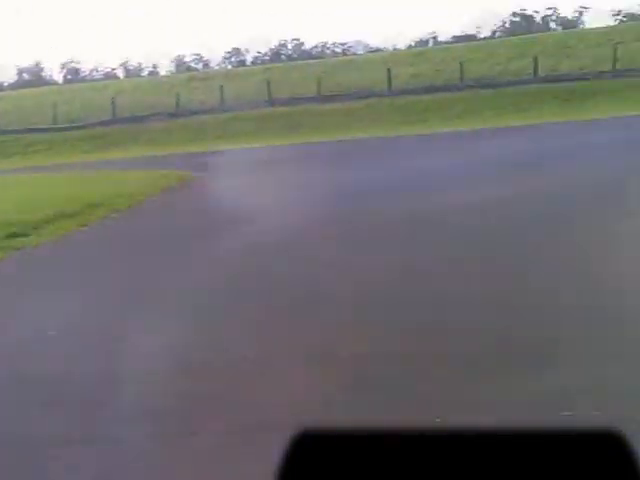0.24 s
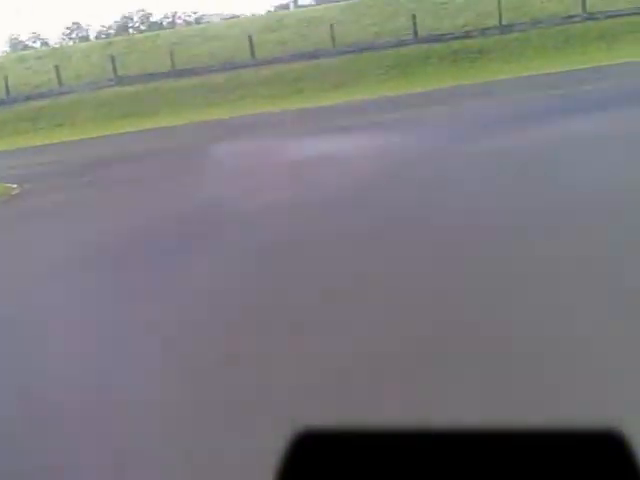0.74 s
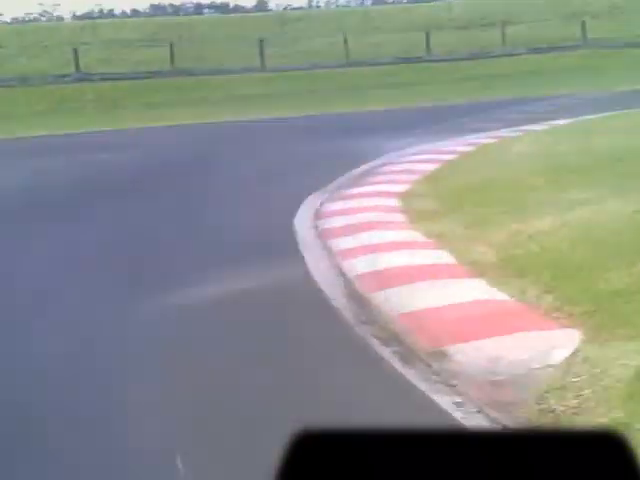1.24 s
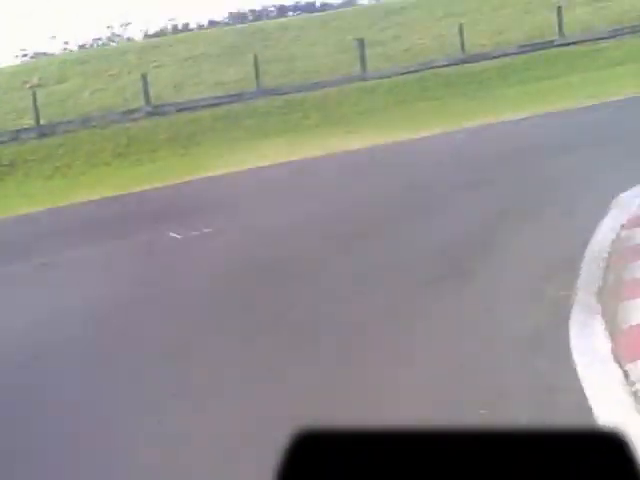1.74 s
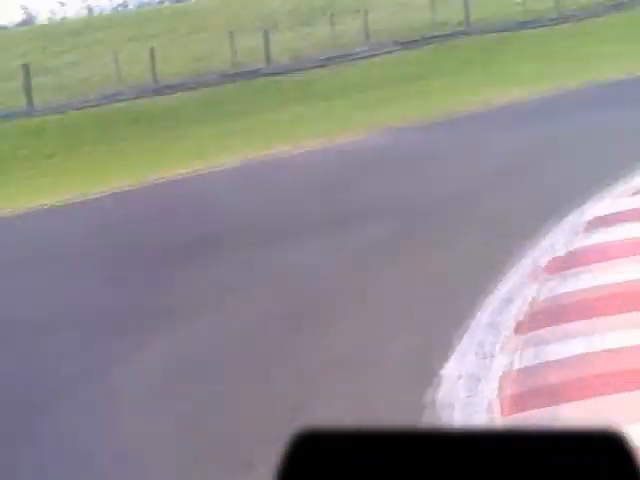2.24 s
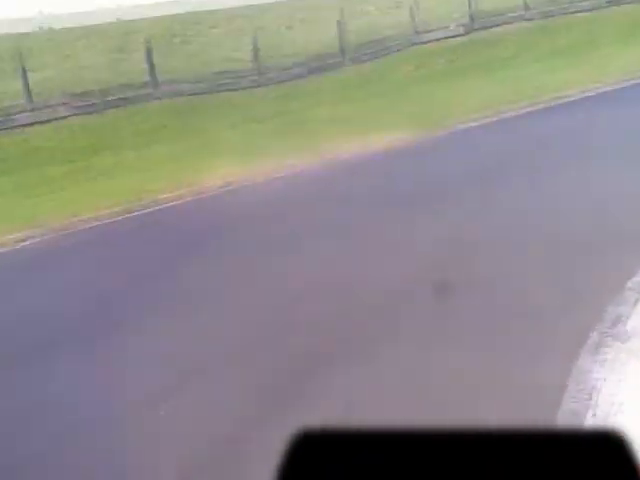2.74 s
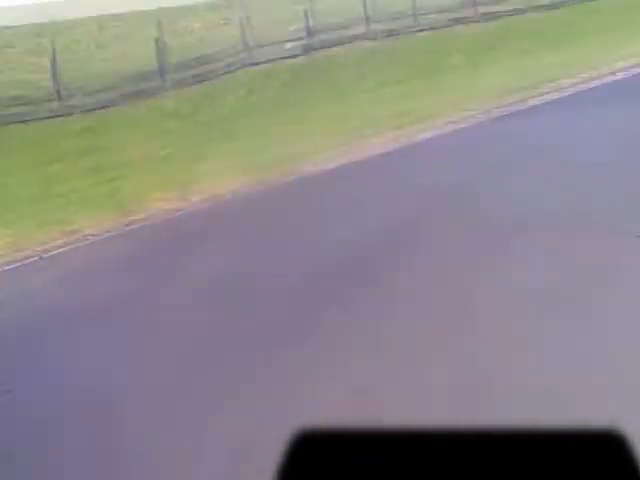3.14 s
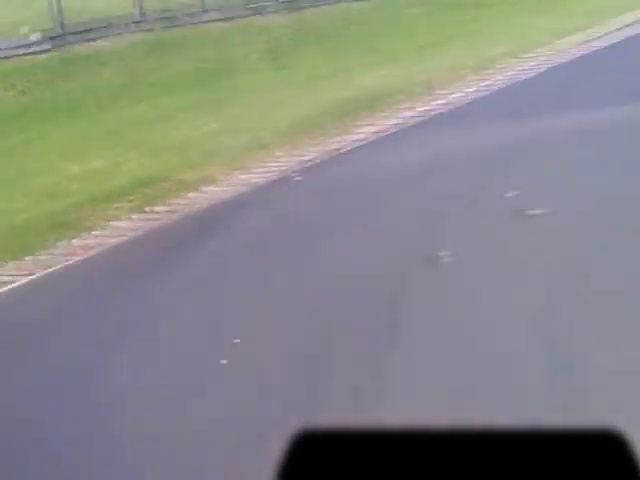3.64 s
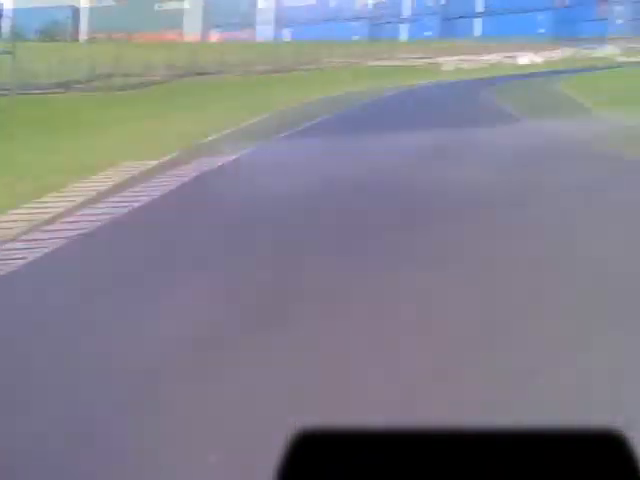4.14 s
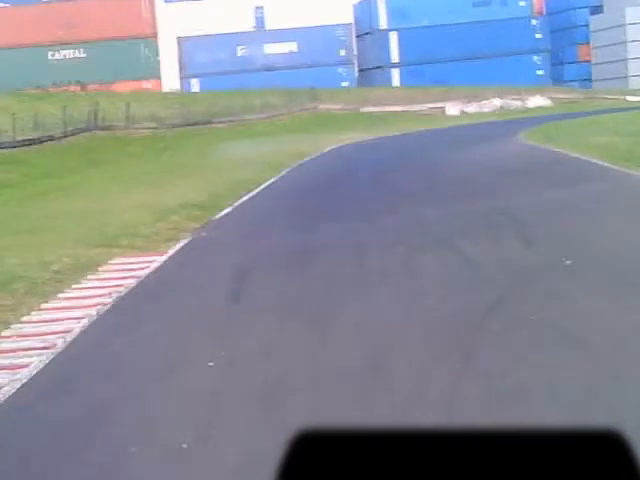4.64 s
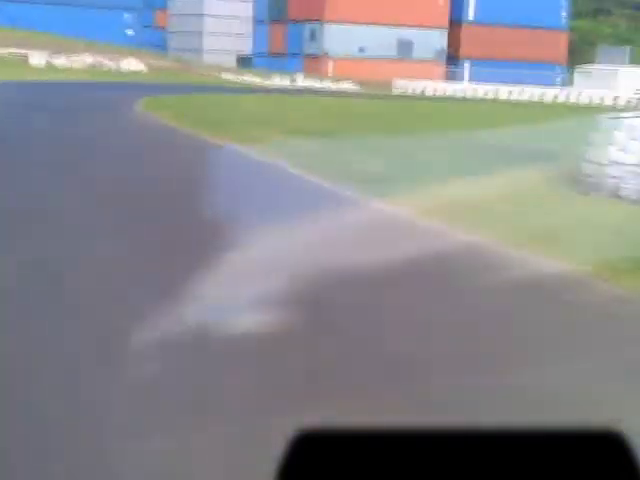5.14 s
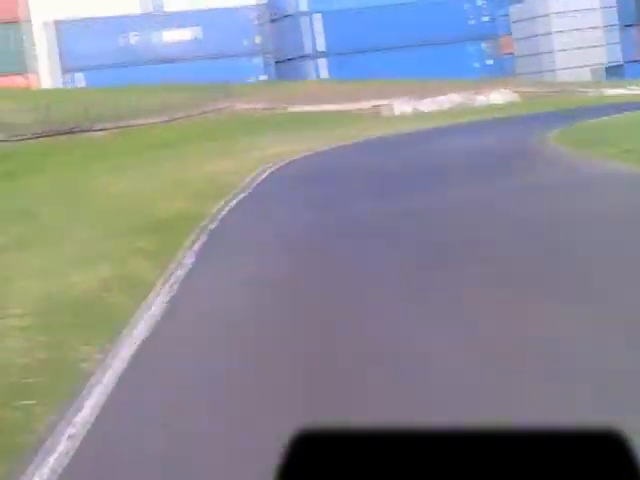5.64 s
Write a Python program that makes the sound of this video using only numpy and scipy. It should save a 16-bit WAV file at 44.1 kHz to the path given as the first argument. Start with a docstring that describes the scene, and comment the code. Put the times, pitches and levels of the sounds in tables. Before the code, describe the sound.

Close on-board microphone on an open-air kart track. First a soft engine putter, wind and a higher rival engine; then a metallic clatter enters abruptly and tyre roar swells around the apex. From about three seconds the engine pulls hard, a rapid booming throb with ringing valve knocks, rattling chain and frame, rising gradually while wind gusts thump the microphone.

```python
"""Kart through a corner and up the straight

On board a four-stroke kart, microphone at the seat: it rolls through a corner, then pulls away. Each firing is
a sum of orders through the pipe, and the airbox boom moves down the orders as the speed climbs; valve knocks
ring the casing and gears whine at orders of the firing rate. Shaped noise makes the frame rattle, the tyre roar
and scrub, and the wind at the microphone. Another engine passes close by in the corner, and a faint whistle
glides on the way in."""
import sys
import numpy as np
from scipy import signal
from scipy.fft import rfft, irfft, next_fast_len
from scipy.io import wavfile

SR = 44100
rng = np.random.default_rng(int(sys.argv[2]) if len(sys.argv) > 2 else 0)


def transcribe(u):
    """Save the signal u as a 16-bit wav file named by the first command-line argument.

    u: samples, shape (n,) or (channels, n), limited to [-1, 1]; the rate is SR.
    q: integer samples, one column per channel.
    """
    v = np.clip(np.atleast_2d(u).T, -1, 1)
    q = np.round(v * 32767).astype(np.int16)
    wavfile.write(sys.argv[1], SR, q)


N = 260190
T = np.arange(N) / SR


def amp(db):
    """Decibels to gain."""
    return 10 ** (np.asarray(db) / 20)


def unit(x):
    """Scales to rms 1."""
    return x / np.sqrt(np.mean(x ** 2) + 1e-20)


def curves(rows, t=T):
    """The columns of a table, joined by straight lines in time."""
    s, *columns = np.transpose(rows)
    return [np.interp(t, s, c) for c in columns]


def hump(x, centre, width):
    """A bell of height 1, half as high at half the width from its centre."""
    return 1 / (1 + (2 * (x - centre) / width) ** 2)


def drift(hz):
    """Slow chance of rms 1, up to about hz."""
    t = np.linspace(0, T[-1], num=4096)
    f = np.fft.rfftfreq(len(t), t[1])
    spectrum = rfft(rng.standard_normal(len(t))) * np.exp(-(f / hz) ** 2)
    return np.interp(T, t, unit(irfft(spectrum)))


def colour(x, spectrum):
    """Filters by a table of f/Hz, level/dB, joined along log frequency; rms 1."""
    hz, db = np.transpose(spectrum)
    size = next_fast_len(N, True)
    f = np.fft.rfftfreq(size, 1 / SR)
    gain = amp(np.interp(np.log(f + 1), np.log(hz + 1), db))
    return unit(irfft(rfft(x, size) * gain, size)[:N])


def ring(x, hz, width):
    """A resonance of gain 1 at its peak."""
    return signal.lfilter(*signal.iirpeak(hz, hz / width, SR), x)


# Engine speed before surging, a lift, a blip for the corner, then the long pull:
# t/s, f/Hz [firings per second]
ENGINE_SPEED = [(0, 45.45), (.3, 45.6), (.55, 41.5), (.8, 42.4), (1.02, 46.4), (1.1, 42.15), (1.8, 43.38),
                (2.7, 44.13), (3.2, 44.71), (3.65, 46.88), (4.1, 48.84), (4.4, 50.65), (5.1, 53.9),
                (5.9, 58.8)]
# Bouts of surging: start t/s, strongest t/s, end t/s, one crest t/s, swing f/Hz [firings per second]
SURGE_BOUTS = [(0.999, 1.502, 4.0, 1.865, .6), (4.1, 5.403, 9, 5.355, 1.15)]
FIRINGS_PER_WHEEL_TURN = 8.52


def crank(jitter=.0012):
    """Firings per second: the speed surges with each turn of the wheels about its slow climb."""
    climb, = curves(ENGINE_SPEED)
    turns = np.cumsum(climb) / SR / FIRINGS_PER_WHEEL_TURN
    surge = 0
    for start, top, end, crest, swing in SURGE_BOUTS:
        depth = np.interp(T, [start, top, end], [0, swing, 0])
        turns_from_crest = turns - np.interp(crest, T, turns)
        surge = surge + depth * np.cos(2 * np.pi * turns_from_crest)
    return (climb + surge) * (1 + jitter * drift(40))


def octaves(corner_rate_hz=43.75):
    """How far the slow climb of engine speed lies above its cornering speed."""
    return np.log2(curves(ENGINE_SPEED)[0] / corner_rate_hz)


# Engine load: t/s, load [0 rolling, 1 pulling, 2 flat out]
ENGINE_LOAD = [(0, 0), (2.75, 0), (3.35, 0.75), (4.1, 0.99), (5.0, 1.84), (5.9, 2)]
# Exhaust effort, the summed strength of orders 6 and up before the boom: t/s, level/dB
EXHAUST_EFFORT = [(0, -39.5), (.8, -41.5), (1.05, -34.5), (1.55, -32), (2.0, -33.5), (2.7, -33.5),
                  (3.1, -27), (3.15, -24.5), (3.5, -19.5), (3.7, -16.5), (4.35, -16.5), (4.95, -19),
                  (5.3, -16.5), (5.6, -17), (5.9, -22)]
# Shape of the exhaust pulse at each load: order [multiples of the firing rate], relative level/dB
PULSE_ROLLING = [(1, -1), (2, 0), (3, -7.5), (4, -5), (5, -13), (6, -6.5), (7, -9), (8, -14), (9, -14.5),
                 (10, -12.5), (11, -24), (12, -12), (13, -11.5), (14, -20), (15, -23.5), (16, -19.5)]
PULSE_PULLING = [(1, -18.5), (2, -7.5), (3, -7.5), (4, -9), (5, -7), (6, 2), (7, -4), (8, -8), (9, -21.5),
                 (10, -15.5), (11, -15.5), (12, -18), (13, -18.5), (14, -36.5), (15, -25), (16, -26)]
PULSE_FLAT_OUT = [(1, -16.5), (2, -13.5), (3, -9.5), (4, -11), (5, -10), (6, -8.5), (7, -13), (8, -16.5),
                  (9, -8), (10, -13), (11, -32), (12, -24), (13, -20), (14, -23.5), (15, -37), (16, -28)]
BOOM_HZ, BOOM_WIDTH_HZ, BOOM_LIFT_DB = 217.25, 31.5, 14.5


def exhaust(cycles, low_db=-2, low_fade_db=1.6, wander_db=1.5):
    """One swell of pipe ringing a firing; load sets its shape, and combustion steadies under pull."""
    t = np.linspace(0, T[-1], num=600)
    load, = curves(ENGINE_LOAD, t)
    pull = np.minimum(load, 1)
    shapes = np.array([PULSE_ROLLING, PULSE_PULLING, PULSE_FLAT_OUT])[:, :, 1]
    db = np.array([np.interp(load, [0, 1, 2], order) for order in shapes.T])
    index = np.arange(len(db))[:, None]  # order minus 1

    effort, = curves(EXHAUST_EFFORT, t)
    db += effort - 20 * np.log10(np.linalg.norm(amp(db[5:]), axis=0))
    db[:3] += low_db - low_fade_db * load
    # whichever order passes the resonance of the airbox booms
    order_hz = (index + 1) * curves(ENGINE_SPEED, t)[0]
    db += BOOM_LIFT_DB * hump(order_hz, BOOM_HZ, BOOM_WIDTH_HZ)
    # off the throttle the orders wander
    wander = np.array([np.interp(t, T, drift(4)) for _ in db])
    db += wander_db * (1 - pull) * wander

    # a firing builds up gradually under pull, and starts more abruptly flat out
    abrupt = np.interp(load, [1, 2], [.2, .5])  # share of minimum phase
    mirrored = amp(np.vstack([db[:1], db, db[-2::-1]]))
    minimum_phase = -signal.hilbert(np.log(mirrored), axis=0).imag[1:len(db) + 1]
    phase = abrupt * minimum_phase
    # the deep gulp of the intake comes part of a cycle before the higher bark of the pipe
    lead = np.interp(load, [0, 1, 2], [0.452, 0.25, 0.17])  # cycles
    phase += 2 * np.pi * lead * np.minimum(index - 5, 0)
    # the silencer smears the highest orders in time, which softens the gentler strokes
    smear = np.interp(load, [0, 1, 2], [0.1275, .12, 0.092])  # radians per order squared
    phase -= smear * np.maximum(index - 6, 0) ** 2

    pulses, turn, wave = 0, np.exp(2j * np.pi * cycles), 1
    for level, angle in zip(db, phase):
        wave = wave * turn  # next order
        strength = np.interp(T, t, amp(level) * np.exp(1j * angle))
        pulses = pulses + (wave * strength).real
    rough = np.interp(np.interp(T, t, load), [0, 1], [0.12, 0.02])
    return -np.sqrt(2) * pulses * (1 + rough * drift(30))


# Valve knocks within one engine cycle, ahead of a shared lag: place [0-1 of a cycle], strength
VALVE_KNOCKS = [(0, 1), (.444, .8)]


def knocks(cycles, length, lag=.12):
    """Dying bursts at the valve events; length and lag are in cycles."""
    return sum(size * np.exp(-((cycles - place - lag) % 1) / length) for place, size in VALVE_KNOCKS)


# Casing resonances: f/Hz, width f/Hz, relative level/dB
CASING_MODES = [(960, 66, -9), (1105.6, 150, -4.5), (1224, 110, 12.5), (1321, 43, 2.5), (1600, 310, -11.5),
                (1822, 58, -13.5), (2250, 840, -31)]
# Valve clack, how hard the engine shakes its casing; gears and rattle follow it: t/s, level/dB
CLACK_LEVEL = [(0, -64), (.88, -56), (.97, -35), (1.2, -39), (2.4, -37), (3.05, -29.5), (3.5, -28.5),
               (3.9, -28), (4.15, -33), (4.8, -29.5), (5.27, -26), (5.5, -29), (5.9, -25.5)]


def casing(x):
    """The casing rings at its resonances, each a narrow peak followed by a wider one; rms 1."""
    return unit(sum(amp(db) * ring(ring(x, hz, width), hz, 2 * width) for hz, width, db in CASING_MODES))


def valves(cycles, soft_hz=4500, uneven=0.037):
    """Valve knocks ring the casing; they are cleanest under a steady pull."""
    blows = unit(np.diff(knocks(cycles, 0.0028), prepend=0)) * (1 + uneven * drift(80))
    blows = signal.sosfilt(signal.butter(2, soft_hz, fs=SR, output="sos"), blows)
    chatter = knocks(cycles, 0.41) * rng.standard_normal(N)
    loose = np.interp(curves(ENGINE_LOAD)[0], [0, 1, 2], [0.28, 0.055, 0.49])
    mix = np.sqrt(1 - loose ** 2) * casing(blows) + loose * casing(chatter)
    return amp(curves(CLACK_LEVEL)[0]) * mix


# Gear whines, each swelling as it crosses a resonance:
# order [of the firing rate], level/dB [against the clack], resonance f/Hz, width f/Hz, lift/dB
GEAR_WHINES = [(22, -14, 1195, 52, 12), (44, -27, 2280, 80, 15.5), (43, -30.5, 1840, 92, 25.5),
               (42, -30.5, 2335, 80, 12.5)]
TEETH = 22


def gears(rate, cycles, slack=0.34, throb=0.33):
    """Tooth whines locked to the crank, throbbing with each turn and shaken by backlash."""
    angle = 2 * np.pi * cycles + slack * drift(45) / TEETH  # slack in radians of tooth phase
    whine = 0
    for order, db, hz, width, lift in GEAR_WHINES:
        order = round(order)
        level = db + lift * hump(order * rate, hz, width)
        whine = whine + amp(level) * np.sin(order * angle)
    throbbing = 1 + throb * np.cos(2 * np.pi * 2 * cycles)  # two crank turns a firing
    return np.sqrt(2) * amp(curves(CLACK_LEVEL)[0]) * whine * throbbing


# Spectrum of the chain and frame chatter: f/Hz, relative level/dB
RATTLE_SPECTRUM = [(700, -11), (1000, -7.5), (1300, 0), (1650, 1), (1900, -8), (2030, -16), (2350, -3.5),
                   (2700, -18.5), (3100, -16.5), (4100, -22.5), (4450, -28), (5050, -21.5), (6400, -34),
                   (7000, -30.5), (7450, -23), (8200, -34), (10000, -43.5), (11500, -52.5), (15000, -74)]
# the base level holds at cornering speed with the clack at 0 dB; FOLLOW is dB per dB of clack
RATTLE_BASE_DB, RATTLE_FOLLOW, RATTLE_DB_PER_OCTAVE = -32.5, .12, 8.5


def rattle(cycles, steady=1.4, flicker_db=0.5):
    """Chain and frame chatter, strongest at each knock; it grows with speed and with the clack."""
    shake = (steady + knocks(cycles, 0.18)) * amp(flicker_db * drift(60))
    db = RATTLE_BASE_DB + RATTLE_FOLLOW * curves(CLACK_LEVEL)[0] + RATTLE_DB_PER_OCTAVE * octaves()
    return amp(db) * colour(shake * rng.standard_normal(N), RATTLE_SPECTRUM)


# Spectrum of the tyre roar: f/Hz, relative level/dB
ROAD_SPECTRUM = [(20, -19.5), (60, 1), (110, -0.5), (250, -3), (400, -9), (560, -6), (700, -11),
                 (1000, -11), (1300, -18.5), (2500, -37.5), (6000, -77.5), (15000, -81.5)]
# Swells of the roar, in the corner and beside the kerb: t/s, length t/s, lift/dB
ROAR_SWELLS = [(2.44, 1.3, 5.5), (4.421, .35, 4.5)]
ROAR_CORNER_DB, ROAR_DB_PER_OCTAVE = -32.5, 5.5  # between swells, at cornering speed
APEX_S, APEX_LENGTH_S, SCRUB_DB, APEX_LIFT_DB = 2.2, 0.26, -51.5, 17.5


def tyres(bump_db=1.24, scrub_hz=760, scrub_width_hz=220):
    """Rolling roar over small bumps that grows with speed, and a scrub at the apex."""
    roar = colour(rng.standard_normal(N) * amp(bump_db * drift(49)), ROAD_SPECTRUM)
    swell_db = sum(lift * hump(T, s, length) for s, length, lift in ROAR_SWELLS)
    roar_db = ROAR_CORNER_DB + ROAR_DB_PER_OCTAVE * octaves() + swell_db
    scrub = ring(rng.standard_normal(N), scrub_hz, scrub_width_hz)
    scrub = unit(ring(scrub, scrub_hz, scrub_width_hz))
    scrub_db = SCRUB_DB + APEX_LIFT_DB * hump(T, APEX_S, APEX_LENGTH_S)
    return amp(roar_db) * roar + amp(scrub_db) * scrub


# The other engine, ahead of its closing fade: t/s, f/Hz [firings per second], level/dB
RIVAL_PASS = [(0, 62, -55), (.3, 59, -38), (.5, 61, -39), (.65, 64, -31), (.8, 66.6, -29.5), (1.0, 67, -36),
              (1.15, 69.8, -31), (1.5, 70.4, -33), (2.2, 78, -40)]
# Its exhaust pulse: order, relative level/dB
RIVAL_ORDERS = [(1, -7), (2, 5.5), (3, -7.5), (4, -1), (5, -17), (6, -8), (7, -9.5), (8, -14.5), (9, -24),
                (10, -22)]


def rival(waver_db=1.5, fade_db_per_s=40):
    """Another engine close by in the corner, its orders wavering as it moves; then it falls away."""
    hz, db = curves(RIVAL_PASS)
    db = db - fade_db_per_s * np.maximum(T - RIVAL_PASS[-1][0], 0)
    angle = 2 * np.pi * np.cumsum(hz * (1 + .006 * drift(12.1))) / SR
    orders = sum(amp(level + waver_db * drift(4.2)) * np.cos(round(k) * angle)
                 for k, level in RIVAL_ORDERS)
    return amp(db) * unit(orders)


# A faint wandering whistle on the way into the corner: t/s, f/Hz
WHISTLE_GLIDE = [(0, 2740), (.2, 2420), (.49, 2730), (.85, 2358), (1.0, 2320)]
WHISTLE_DB, WHISTLE_END_S, WHISTLE_FADE_DB_PER_S = -59.5, .85, 190


def whistle(waver=0.0057, flutter_db=4):
    """A thin fluttering tone that glides up and down, then dies."""
    hz, = curves(WHISTLE_GLIDE)
    fade_db = WHISTLE_FADE_DB_PER_S * np.maximum(T - WHISTLE_END_S, 0)
    db = WHISTLE_DB + flutter_db * drift(25) - fade_db
    angle = 2 * np.pi * np.cumsum(hz * (1 + waver * drift(60))) / SR
    return np.sqrt(2) * amp(db) * np.sin(angle)


# Spectrum of wind on the microphone: f/Hz, relative level/dB
WIND_SPECTRUM = [(2, 6), (8, 13.5), (20, 3.5), (45, -5.5), (70, -15), (110, -28), (250, -42), (1000, -70),
                 (15000, -100)]
# Buffets: t/s, lift/dB [above the steady wind]
WIND_GUSTS = [(.1, 4.5), (1.47, 5), (2.2, 4.5), (2.33, 5), (2.75, 4.5), (3.26, 4.5), (3.55, 4), (4.31, 9),
              (4.43, 5), (4.58, 4), (4.82, 8.5)]
WIND_DB, GUST_LENGTH_S = -23.5, 0.098


def wind(lump_db=1.0):
    """Steady low buffeting at the microphone, with a few short gusts."""
    db = WIND_DB + sum(lift * hump(T, s, GUST_LENGTH_S) for s, lift in WIND_GUSTS)
    return amp(db) * colour(rng.standard_normal(N) * amp(lump_db * drift(39)), WIND_SPECTRUM)


def scene():
    """Everything as heard from the seat."""
    rate = crank()
    cycles = np.cumsum(rate) / SR  # one engine cycle a firing
    kart = exhaust(cycles) + valves(cycles) + gears(rate, cycles) + rattle(cycles) + tyres()
    return (kart + rival() + whistle() + wind())[None]


# Overall level, a swell and then a step down: t/s, level/dB
OVERALL_LEVEL = [(0, 0), (3.3, 0), (3.565, 2), (3.59, -3.5), (3.9, -2)]
TREBLE_EDGE_HZ, HISS_DB = 15100, -80  # hiss level before the treble is cut


def record(dry):
    """The level swells and steps down, faint microphone hiss joins, and the top treble is cut."""
    lowpass = signal.firwin(511, TREBLE_EDGE_HZ, window=("kaiser", 9), fs=SR)
    hiss = amp(HISS_DB) * rng.standard_normal(N)
    levelled = dry * amp(curves(OVERALL_LEVEL)[0])
    return signal.oaconvolve(levelled + hiss, lowpass[None], "same")


dry = scene()
out = record(dry)
transcribe(out)
```